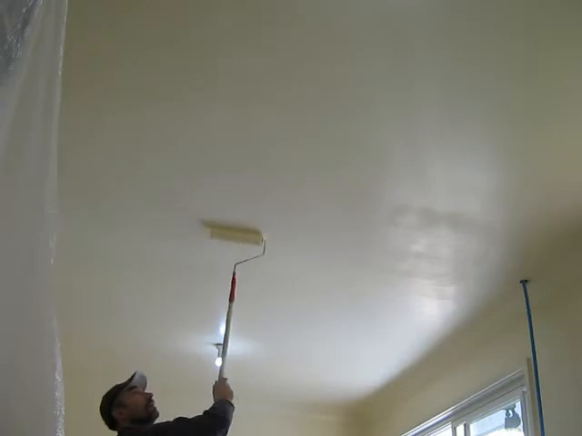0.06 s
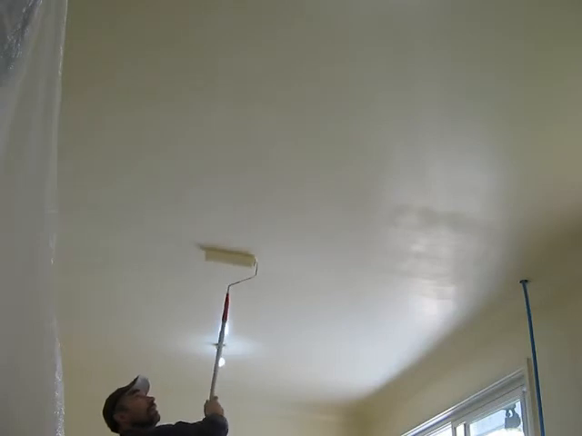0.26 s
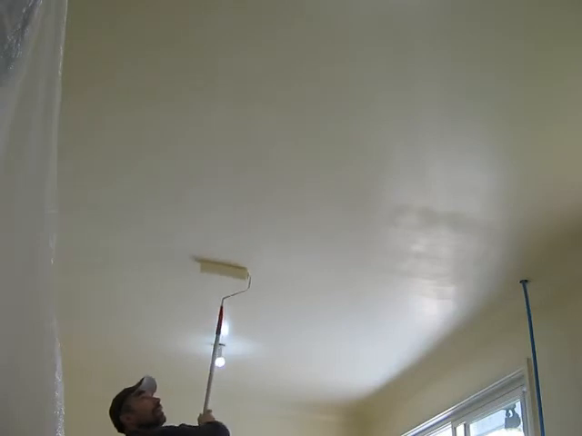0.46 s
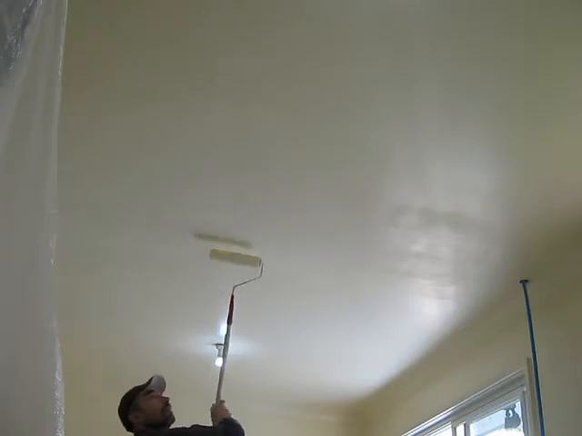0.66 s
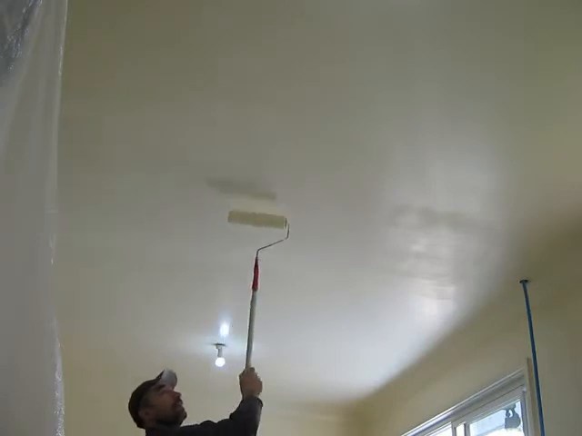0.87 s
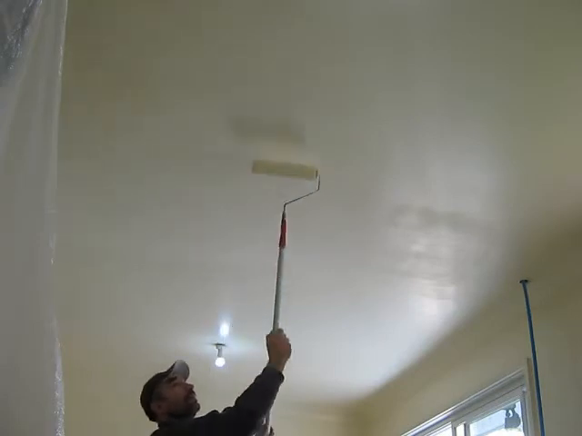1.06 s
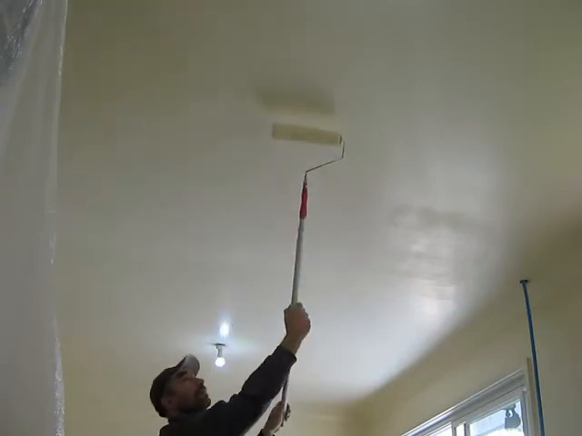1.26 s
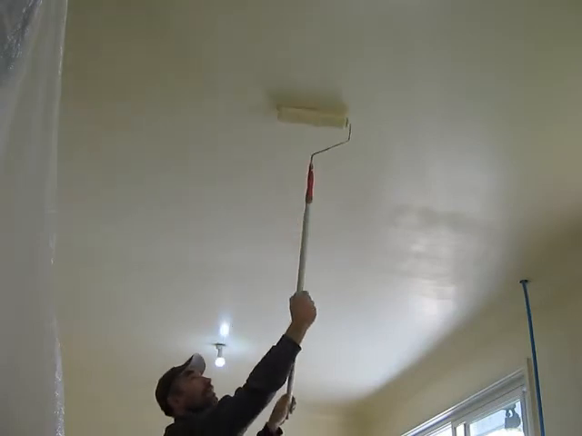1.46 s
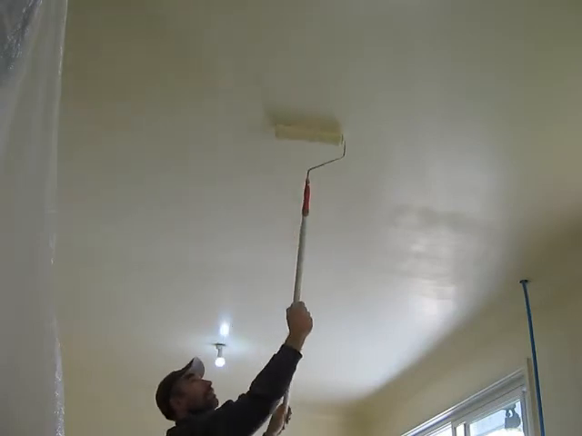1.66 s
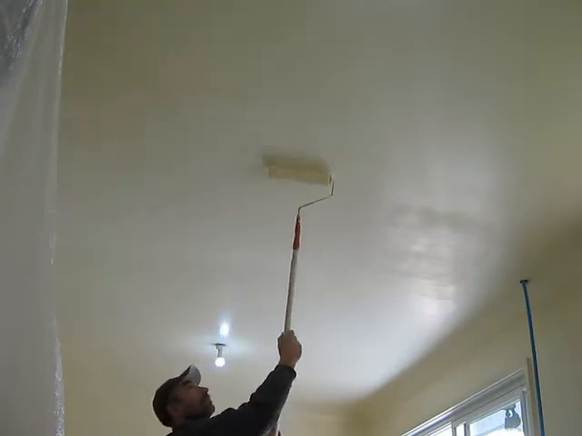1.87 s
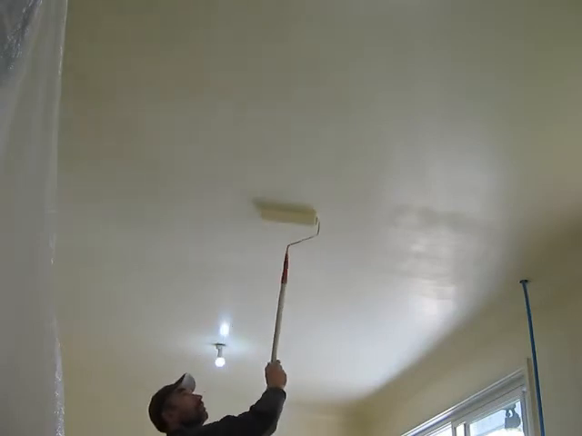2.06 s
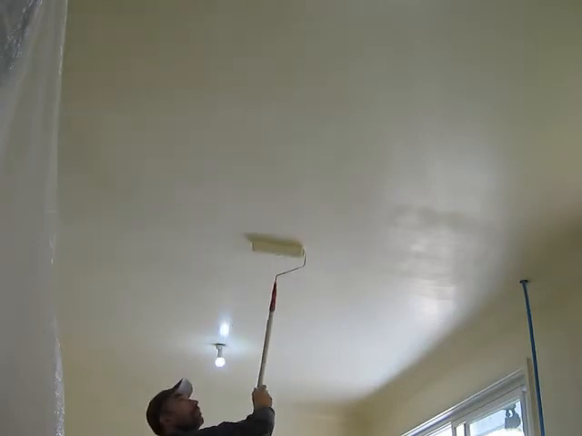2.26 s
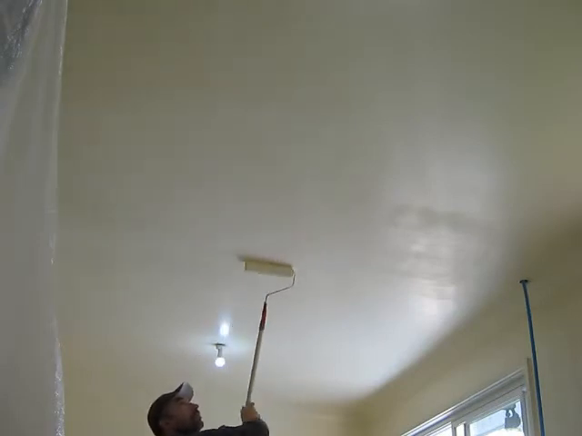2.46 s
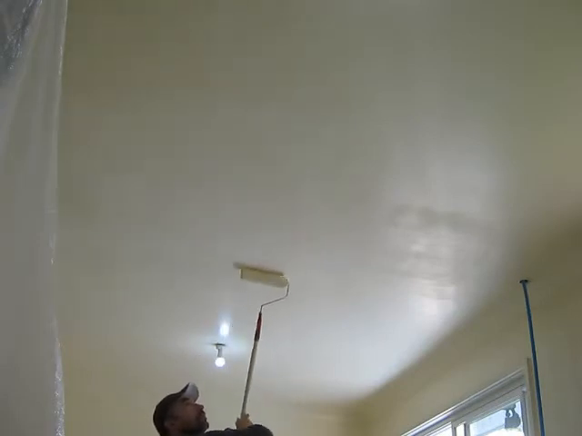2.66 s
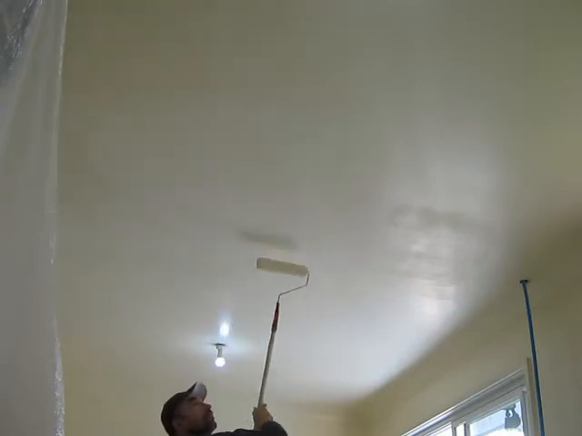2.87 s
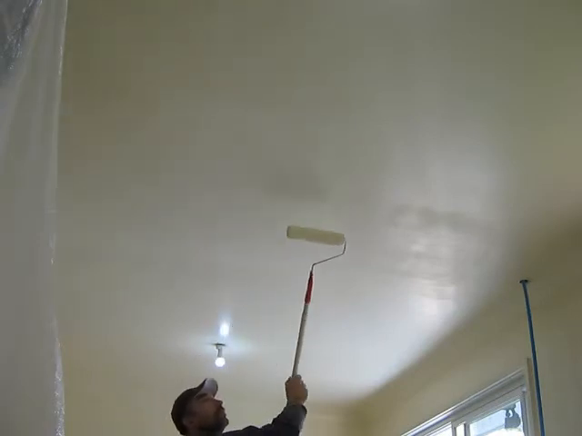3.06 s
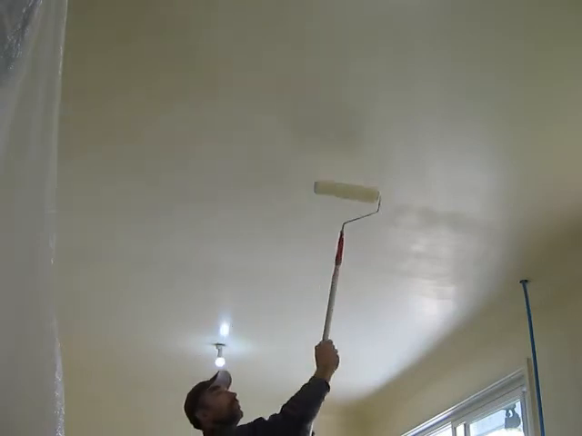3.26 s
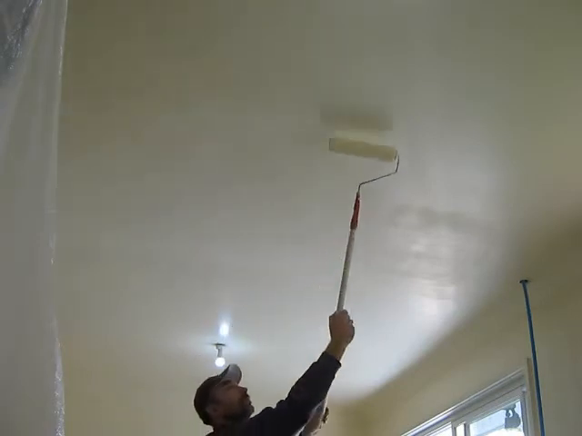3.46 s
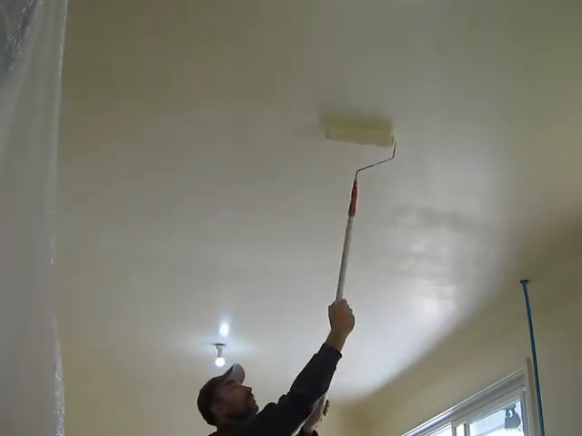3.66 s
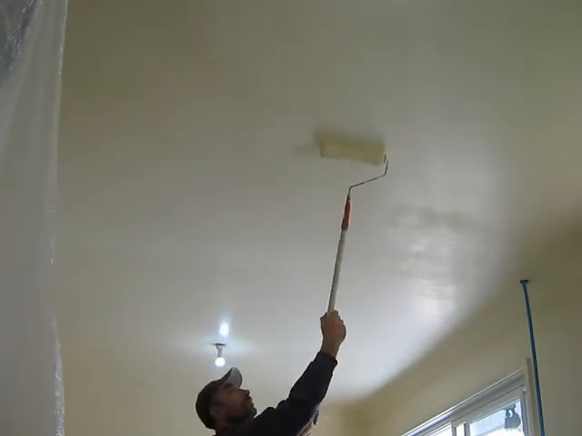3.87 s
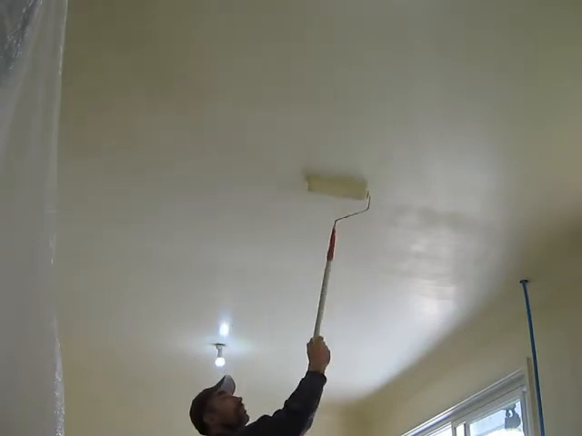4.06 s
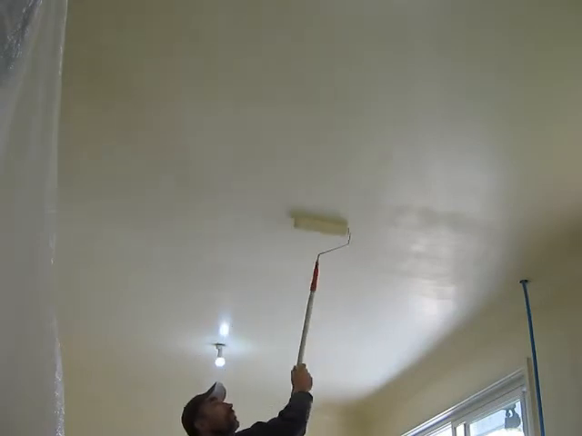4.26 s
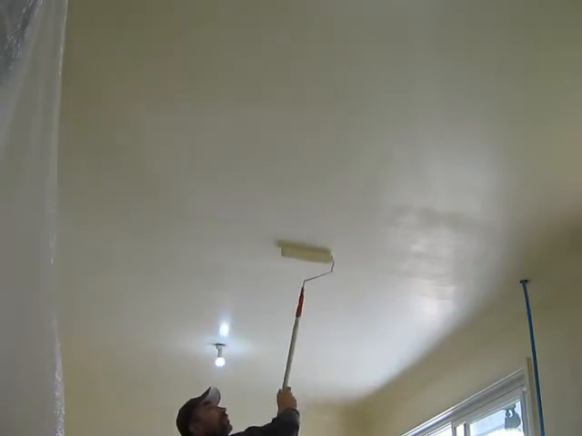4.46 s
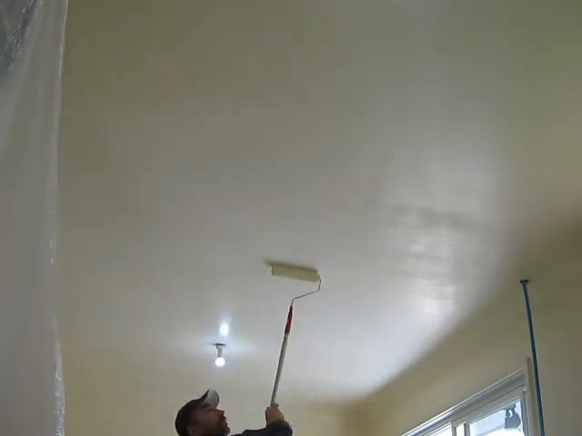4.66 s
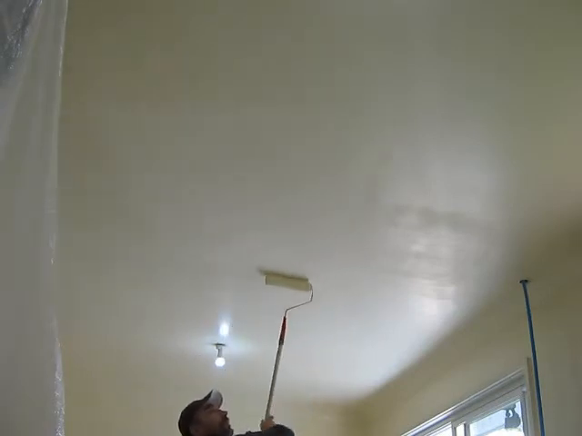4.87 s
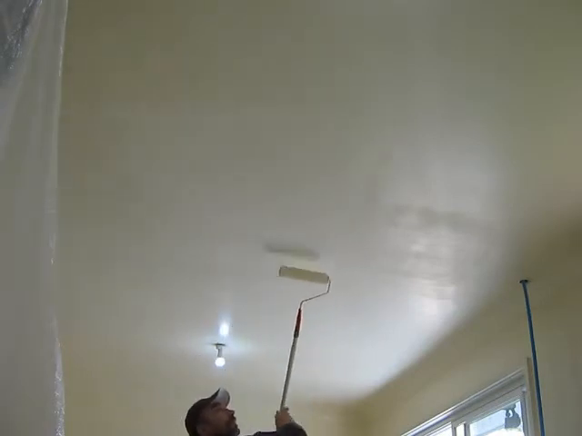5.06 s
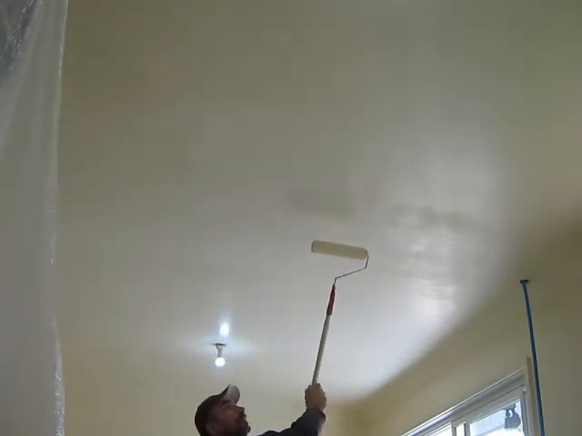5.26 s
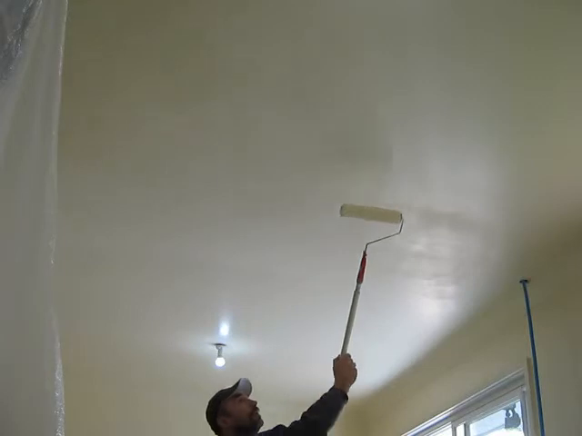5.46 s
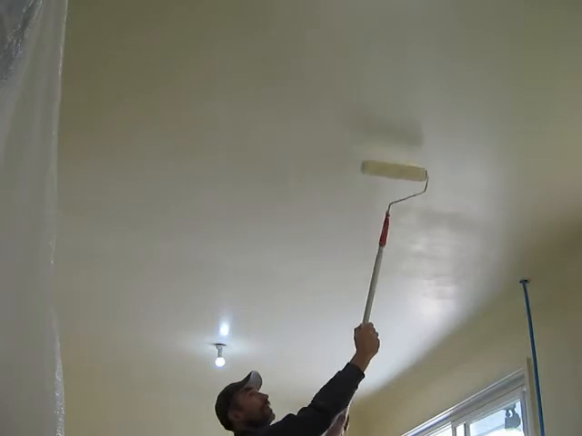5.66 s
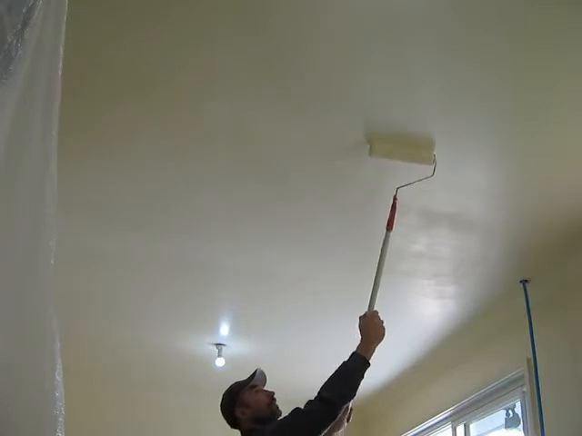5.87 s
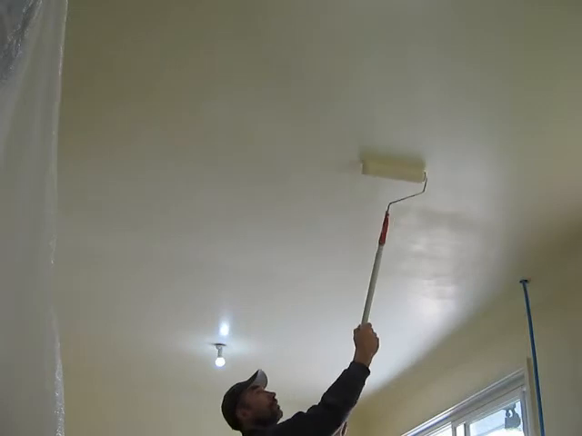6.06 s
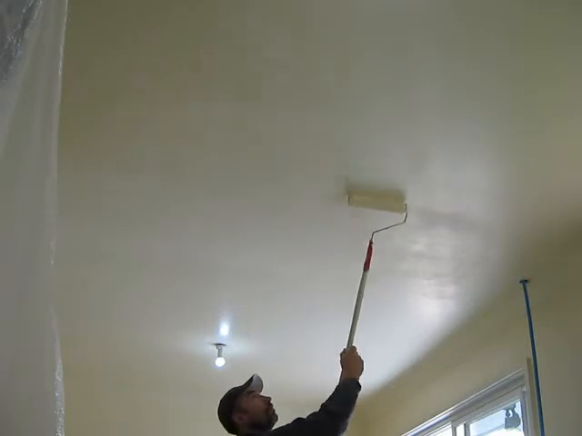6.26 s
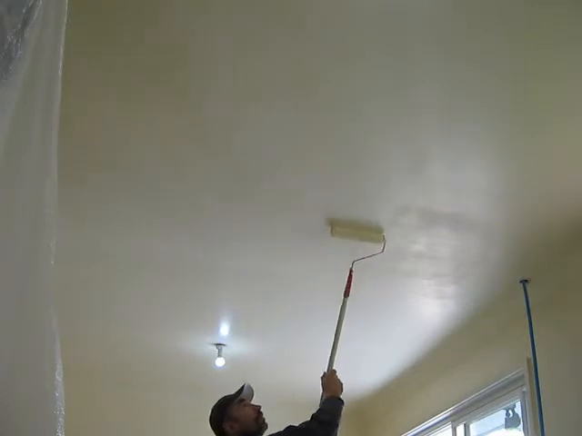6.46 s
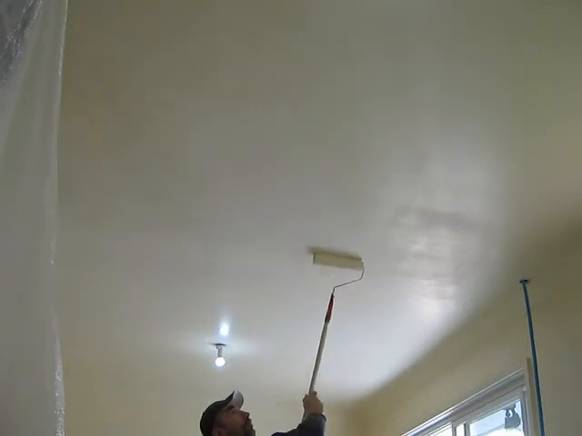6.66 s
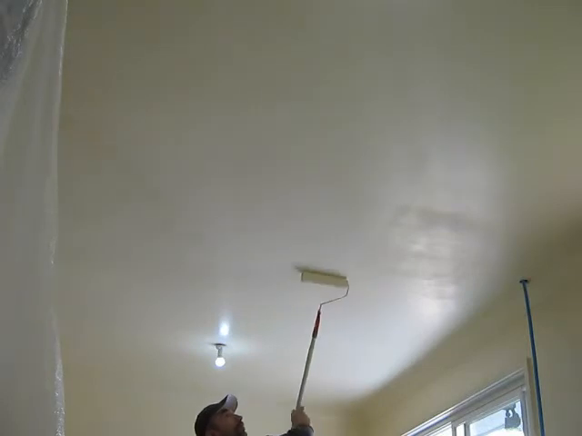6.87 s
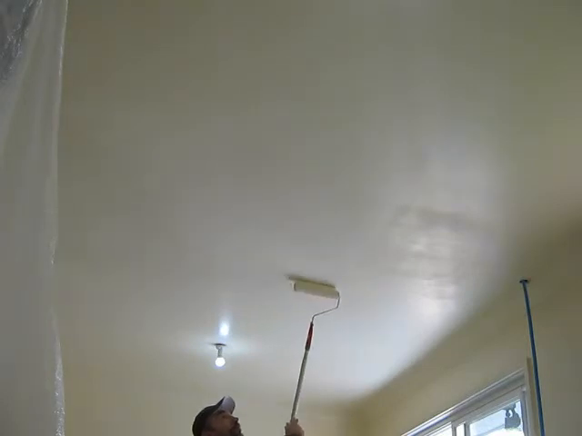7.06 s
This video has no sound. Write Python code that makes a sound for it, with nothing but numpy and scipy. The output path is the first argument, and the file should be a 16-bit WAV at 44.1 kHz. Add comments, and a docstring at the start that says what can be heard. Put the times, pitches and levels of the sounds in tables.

```python
"""Four long, crackling hisses with a low drumming under them, and rattles, thumps and shuffles in between.
A paint roller on a pole is pulled across a ceiling in a bare room; the first pull is already under way.
The hiss is many tiny random clicks, like snapping threads of wet paint. The drumming is noise and blows
that set the ceiling board ringing. Bursts of coloured noise make the cloth and the wire frame.
A low sample rate and coarse level steps roughen the whole mono sound."""
import sys
import numpy as np
from scipy import signal
from scipy.fft import rfft, irfft
from scipy.io import wavfile

SR = 44100
rng = np.random.default_rng(int(sys.argv[2]) if len(sys.argv) > 2 else 0)


def bounce(signal):
    """Save signal as a 16-bit WAV file at the path given by the first command-line argument."""
    frames = np.transpose(np.atleast_2d(signal))
    limited = np.clip(frames, -1, 1)
    pcm = np.round(limited * 32767).astype(np.int16)
    wavfile.write(sys.argv[1], SR, pcm)


N = 313551
T = np.arange(N) / SR  # time of each sample in seconds

# Levels in these tables are relative: mixing, ringing and the room come on top.
# Pulls of the roller. Each row: start, end, time spent speeding up and time spent slowing in seconds,
# hiss level in dB, sag of the hiss in dB per second, rumble level in dB, a moment when the wet side peels
# and the time of one turn in seconds, moment of crossing a hollow patch in seconds, its extra rumble in dB.
PULLS = [(-.3, 0.451, .2, 0.038, -32, 4.5, -46, .234, .134, .1, 2.5),
         (1.525, 2.641, .19, .12, -32, 3, -43.5, 2.09, .118, 2.045, 9),
         (3.71, 4.868, .24, .155, -30.5, 6.5, -44.5, 4.354, .119, 4.165, 8),
         (5.948, 7.056, .23, .17, -33, 3.5, -43, 6.649, .126, 6.31, 4.5)]
# Wet bits of the nap (the roller's fluff) dab and snap. Each row: start in seconds, level in dB,
# fade time in seconds.
DABS = [(.65, -50, 0.071), (.69, -49, 0.036), (1.462, -50, 0.054), (1.555, -35.5, 0.0031),
        (1.708, -32, 0.017), (2.324, -29, 0.0046), (2.9, -54, 0.066), (2.955, -48.5, .05),
        (3.644, -45.5, 0.024), (3.762, -45.5, 0.019), (3.975, -31.5, 0.018), (4.879, -43.5, 0.0058),
        (5.808, -45.5, 0.057), (6.115, -32, 0.014), (6.265, -25, 0.011), (6.405, -30.5, 0.0058),
        (6.645, -30, .005)]
# Colour of tearing paint. Each row: frequency in Hz, level in dB per Hz.
PAINT_COLOUR = [(150, -20.5), (450, -13), (900, -12), (1300, -12), (2000, -6), (2900, -3), (4200, -1),
                (5500, 0.5)]
# Colour of the nap pattering on the board. Each row: frequency in Hz, level in dB per Hz.
NAP_COLOUR = [(25, -16), (50, -4), (80, -3.5), (130, -4.5), (230, -2), (340, -8), (500, -16), (1000, -18.5),
              (3000, -60)]
# Tones of the ceiling board. Each row: frequency in Hz, level in dB, time to fall by 60 dB in seconds.
CEILING_TONES = [(32.85, -20, 2.6), (54.7, -7, .7), (63.7, -9.5, 0.3), (95.2, -1.5, .3), (119.6, 2.5, 0.27),
                 (136, -0.5, 0.19), (179, -6, 0.18), (216.8, 1.5, 0.26), (249.4, -9, 0.31)]
# The roller lands on the ceiling. Each row: start in seconds, level in dB, contact time in seconds.
LANDINGS = [(1.452, -48, .007), (1.472, -41.5, 0.0082), (1.494, -35.5, 0.0092), (3.647, -43, 0.014),
            (3.673, -45.5, 0.0076), (5.81, -33.5, 0.0043), (5.832, -34, 0.0048)]
# The roller judders after a hard landing. Each row: start and length in seconds,
# first gap between blows in seconds, level in dB.
JUDDERS = [(1.505, .02, .0104, -46), (5.852, .155, .0082, -45)]
# Colour of the room air. Each row: frequency in Hz, level in dB per Hz.
AIR_COLOUR = [(25, -0.5), (60, -4), (150, -0.5), (300, 0.5), (500, -2.5), (1000, -5.5), (2000, -8.5),
              (5500, -11.5)]
# Sleeves and grip shuffle softly. Each row: start in seconds, level in dB, fade time in seconds.
SHUFFLES = [(.652, -48, 0.052), (.79, -54.5, 0.048), (2.9, -48.5, 0.057), (2.95, -52, 0.034),
            (5.157, -46.5, .05), (5.82, -44.5, 0.078)]
# Colour of rubbing sleeves. Each row: frequency in Hz, level in dB per Hz.
CLOTH_COLOUR = [(40, -15), (90, -0.5), (180, -0.5), (300, -3), (450, -4), (700, -8.5), (1300, -17.5),
                (4000, -35.5)]
# The wire frame and its cage clack. Each row: start in seconds, level in dB, fade time in seconds.
CLACKS = [(.9295, -33.5, 0.0052), (.934, -31, 0.011), (.958, -41.5, 0.03), (5.818, -44.5, 0.04)]
# Colour of the clacking cage. Each row: frequency in Hz, level in dB per Hz.
CAGE_COLOUR = [(200, -20.5), (700, -8), (1050, -1.5), (1270, -10), (1550, 1), (2100, -4), (2700, -2),
               (3500, -5), (4400, -6.5), (5500, -5.5)]
# Colour of the wire buzzing on after a clack. Each row: frequency in Hz, level in dB per Hz.
WIRE_COLOUR = [(500, -14), (850, -5), (1050, -4.5), (1270, -9), (1480, 3), (2100, -0.5), (2400, -15.5),
               (2700, -7.5), (3600, -10.5), (5500, -25.5)]
# Play in the pole joint knocks. Each row: start in seconds, level in dB, contact time in seconds.
KNOCKS = [(.668, -51.5, .0025), (.797, -43, 0.0051), (.826, -50.5, 0.0033), (2.897, -54, 0.00081),
          (2.915, -42, 0.0025), (2.943, -46, 0.0012), (2.974, -49, 0.0008), (4.159, -39.5, .0022)]
# Tones of the pole. Each row: frequency in Hz, level in dB, time to fall by 60 dB in seconds.
POLE_TONES = [(110, -10, 0.18), (156.4, 6, 0.11), (194.6, -3, 0.38), (231, -8.5, 0.064), (326.4, -9, 0.29),
              (440, -12, 0.056)]

ARCH_POWER, PRESS_LAG_S = .65, .035  # the arm bears hardest in mid-stroke and lets go a little late
PEEL_DB, PEEL_SHARE = 2.5, .13  # extra hiss of the wet side, and its width as a share of one turn
HOLLOW_S = .06  # half the time it takes to cross a hollow patch
JUDDER_SLOW_S, CONTACT_SHARE = .11, .55  # the gaps double in this time; share of a gap spent in contact
ROOM_T60_S, ROOM_DB = .5, -3  # time for echoes to fall by 60 dB; echoes against direct sound
AIR_DB = -54.5
HUM_HZ, HUM_DB, HUM_PEAK_S, HUM_SWELL_S = 313.7, -65.5, 3.4, .5
HOLD = 4  # keep one sample in this many
STEP, BIAS = .0055, .25  # size of a level step; shift before rounding, in steps
ALIAS_HZ, TOP_HZ = 5750, 7200  # low-pass limits before and after the coarse steps


def undb(db):
    """Turn decibels into a gain."""
    return 10 ** (np.asarray(db) / 20)


def unit(x):
    """Scale to an average (rms) level of 1."""
    return x / np.sqrt(np.mean(x ** 2))


def colour(x, points):
    """Shape the spectrum through the given points, closing it at both ends; rms 1."""
    hz, db = np.transpose(points)
    f = np.maximum(np.fft.rfftfreq(N, 1 / SR), 1)
    top_end = 1 + (f / hz[-1] / 1.1) ** 20
    low_end = 1 + (20 / f) ** 4
    ends = 1 / np.sqrt(top_end * low_end)
    shape = undb(np.interp(np.log(f), np.log(hz), db))
    return unit(irfft(rfft(x) * ends * shape, N))


def noise(points):
    """Steady noise of a given colour."""
    return colour(rng.standard_normal(N), points)


def walk(rate):
    """Random wandering: straight lines between new random values, rate times a second."""
    return np.interp(T * rate, np.arange(4096), rng.standard_normal(4096))


def bursts(table):
    """Loudness curve of sudden starts that fade away exponentially."""
    return sum(undb(db) * (T >= s) * np.exp(-np.abs(T - s) / fade) for s, db, fade in table)


def blows(table):
    """Each blow is a soft half-sine push; a longer contact sounds deeper."""
    force = np.zeros(N)
    for s, db, contact in table:
        push = np.sin(np.pi * np.clip((T - s) / contact, 0, 1))
        force += undb(db) * push / push.sum()
    return force


def ring(force, tones):
    """A body that is pushed rings in its own tones, each dying away at its own pace."""
    t = T[:2 * SR]
    response = np.zeros(len(t))
    for hz, db, t60 in tones:
        fade = np.exp(-np.log(1000) * t / t60)
        response += undb(db) * np.cos(2 * np.pi * hz * t) * fade
    return signal.fftconvolve(force, response)[:N]


def strokes():
    """Tearing, pressure and board gains: pulls tire, the wet side peels every turn, hollow board drums louder."""
    tearing, pressure, board = np.zeros(N), np.zeros(N), np.ones(N)
    for (start, end, speeding, slowing, hiss_db, sag, rumble_db,
         peel_at, turn, hollow_at, hollow_db) in PULLS:
        speed = np.clip(np.minimum((T - start) / speeding, (end - T) / slowing), 0, 1)
        off_wet_side = ((T - peel_at) / turn + .5) % 1 - .5  # in turns
        peel = np.exp(-(off_wet_side / PEEL_SHARE) ** 2)
        tearing += speed * undb(hiss_db - sag * (T - start) + PEEL_DB * peel)
        progress = np.clip((T - start) / (end + PRESS_LAG_S - start), 0, 1)
        pressure += undb(rumble_db) * np.abs(np.sin(np.pi * progress)) ** ARCH_POWER
        hollow = np.exp(-((T - hollow_at) / HOLLOW_S) ** 2)
        board *= undb(hollow_db * hollow)
    return tearing, pressure, board


def crackle(per_s, spread_db):
    """Snapping paint threads: random clicks, mostly small and a few large, at even power."""
    share = np.clip(per_s / SR, 1e-4, 1)  # chance of a click at each sample
    size = undb(spread_db * np.minimum(rng.exponential(size=N), 6))
    snaps = rng.random(N) < share
    sign = rng.choice([-1, 1], N)
    return colour(snaps * sign * size / np.sqrt(share), PAINT_COLOUR)


def paint(tearing, threads_per_s=12000, spread_db=2.5, patchy_db=.5, tuft_db=1.27, gain_db=1.96):
    """Stronger tearing snaps more threads; wet patches and tufts make the hiss uneven."""
    strength = tearing / tearing.max()
    uneven = undb(patchy_db * walk(28) + tuft_db * walk(260))
    threads = crackle(threads_per_s * (.3 + strength), spread_db)
    rolling = undb(gain_db) * tearing * unit(uneven) * threads
    return rolling + bursts(DABS) * crackle(9000, 1.6)


def room(x, size=2048, count=20000):
    """Bare walls add a dense echo tail, with a new random pattern for each short piece as the roller moves."""
    t = T[:count]
    decay = np.exp(-np.log(1000) * t / ROOM_T60_S) * (t > .003)
    pieces = np.pad(x, (0, -N % size)).reshape(-1, size)
    tails = rng.standard_normal((len(pieces), count)) * decay / np.sqrt(np.sum(decay ** 2))
    wet = np.zeros(N + 2 * size + count)
    for k, echo in enumerate(signal.fftconvolve(pieces, tails, axes=1)):
        wet[k * size:k * size + len(echo)] += echo
    return (x + undb(ROOM_DB) * wet[:N]) / np.sqrt(1 + undb(2 * ROOM_DB))


def judders():
    """List the blows of each judder: they come ever slower, with longer and so duller contacts."""
    rows = []
    for s, length, first_gap, db in JUDDERS:
        age = 0
        while age < length:
            gap = first_gap * (1 + (age / JUDDER_SLOW_S) ** 2)
            rows.append((s + age, db, CONTACT_SHARE * gap))
            age += gap
    return rows


def rumble(pressure, board, nap_db=-2, board_db=-3.5, drag_hz=48, nap_share=.45):
    """The lumpy nap patters on the board, and slower pushes and landings set its low tones ringing."""
    low_pass = signal.butter(2, drag_hz, fs=SR, output="sos")
    pushes = signal.sosfilt(low_pass, rng.standard_normal(N))
    drag = undb(board_db) * pressure * board * pushes / np.std(ring(pushes, CEILING_TONES))
    # a hollow patch lifts the patter less than the drag
    patter = undb(nap_db) * pressure * board ** nap_share * noise(NAP_COLOUR)
    return patter + ring(drag + blows(LANDINGS) + blows(judders()), CEILING_TONES)


def background(waver_db=2.0, waver_hz=1):
    """Quiet room noise, and a faint sine hum that wavers in pitch and level, swells once and fades."""
    pitch = HUM_HZ + waver_hz * walk(8)
    hum = np.sqrt(2) * np.sin(2 * np.pi * np.cumsum(pitch) / SR)
    swell = np.exp(-((T - HUM_PEAK_S) / HUM_SWELL_S) ** 2)
    air = undb(AIR_DB) * noise(AIR_COLOUR)
    return air + undb(HUM_DB + waver_db * walk(2.7)) * swell * hum


def handling(buzz_db=-7, buzz_s=.034):
    """Sleeves shuffle as the pole is swung back; the cage clacks and its loose wire buzzes on briefly."""
    shuffles = bursts(SHUFFLES) * noise(CLOTH_COLOUR)
    clacks = bursts(CLACKS)
    keep = np.exp(-1 / (buzz_s * SR))
    # smoothing the power of the clacks lets the buzz outlast them
    buzz = np.sqrt(signal.lfilter([1 - keep], [1, -keep], clacks ** 2))
    return shuffles + clacks * noise(CAGE_COLOUR) + undb(buzz_db) * buzz * noise(WIRE_COLOUR)


def pole_knocks():
    """Knocks in the loose joint set the pole ringing in its own tones."""
    return ring(blows(KNOCKS), POLE_TONES)


def scene():
    """Mix roller, ceiling, pole and room, the same in both channels."""
    tearing, pressure, board = strokes()
    in_room = room(paint(tearing) + handling())
    mono = in_room + rumble(pressure, board) + pole_knocks() + background()
    return np.array([mono, mono])


def record(dry):
    """Sample at a quarter of the rate in coarse level steps, which adds a gritty hiss to the pauses."""
    low_pass = signal.butter(20, ALIAS_HZ, fs=SR, output="sos")
    slow = signal.sosfilt(low_pass, dry)[:, ::HOLD]
    stepped = STEP * np.round(slow / STEP + BIAS)
    # back to the full rate; the gentle filter lets some mirrored treble through
    smooth = signal.firwin(65, 5512, window=("kaiser", 9), fs=SR)
    out = signal.resample_poly(stepped, HOLD, 1, axis=1, window=smooth)[:, :N]
    return signal.sosfilt(signal.ellip(8, .1, 70, TOP_HZ, fs=SR, output="sos"), out)


dry = scene()
out = record(dry)
bounce(out)
```